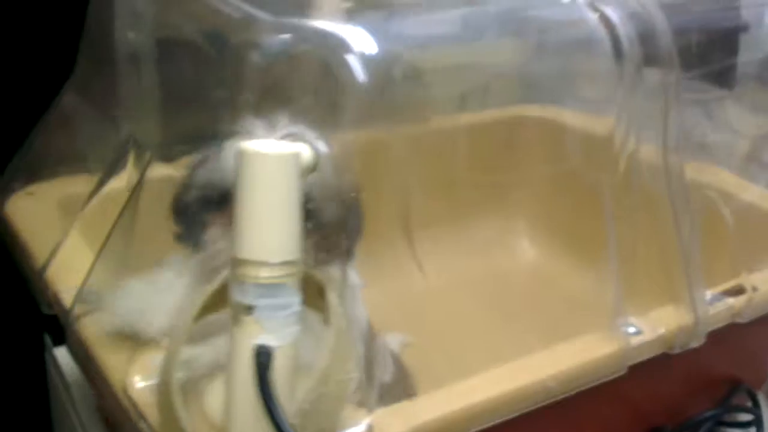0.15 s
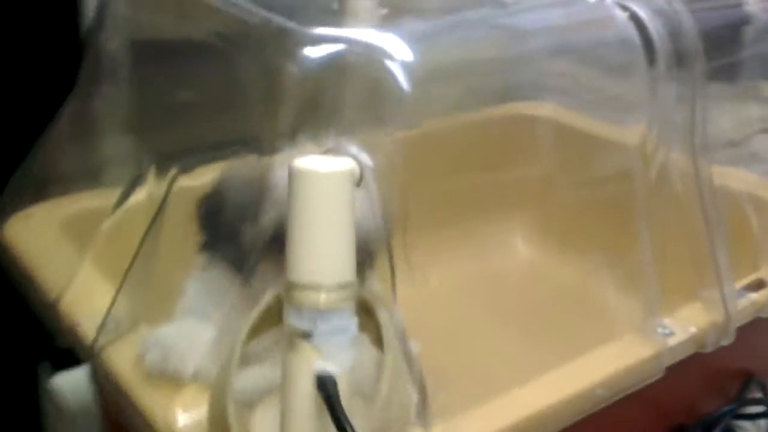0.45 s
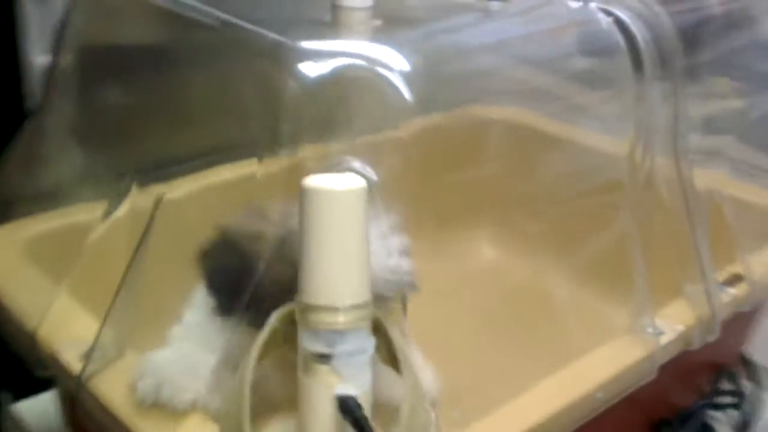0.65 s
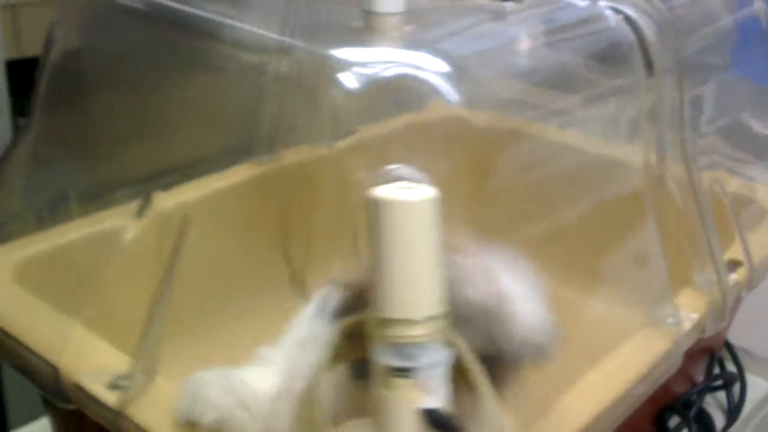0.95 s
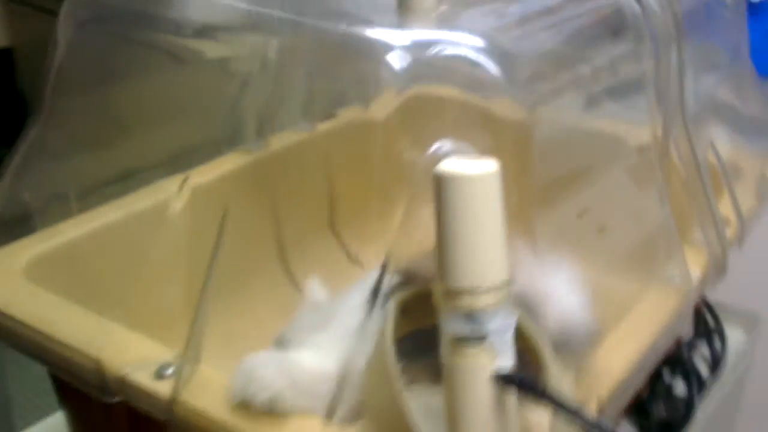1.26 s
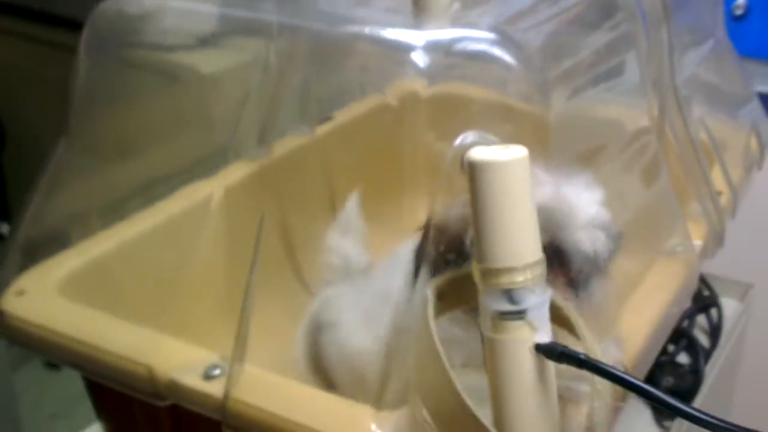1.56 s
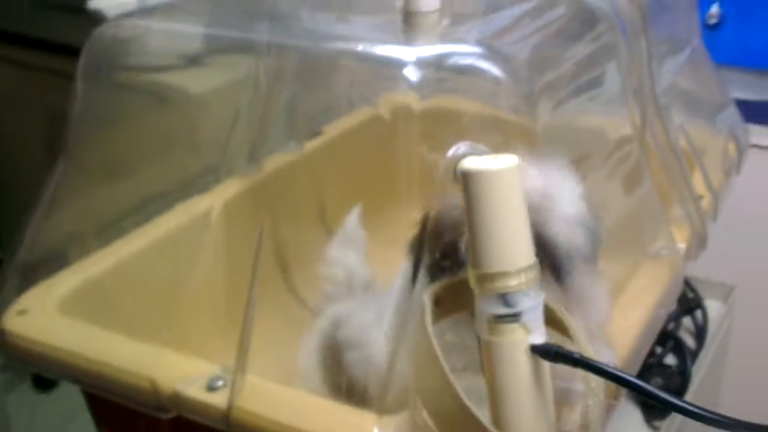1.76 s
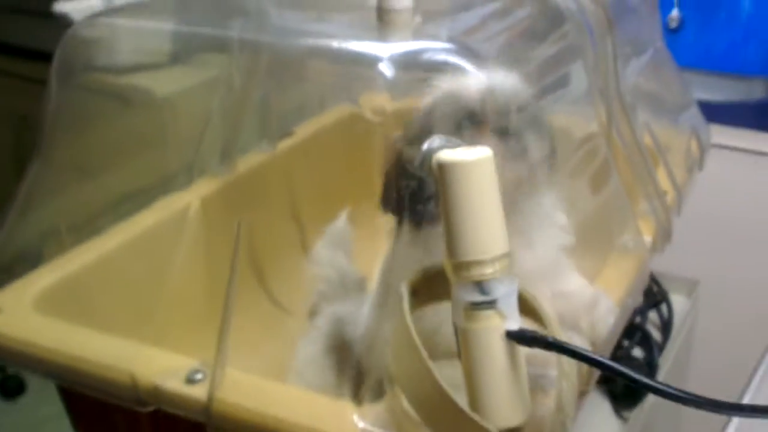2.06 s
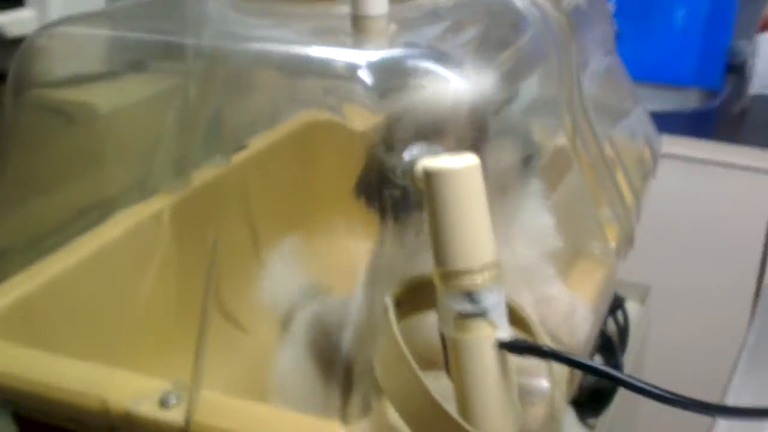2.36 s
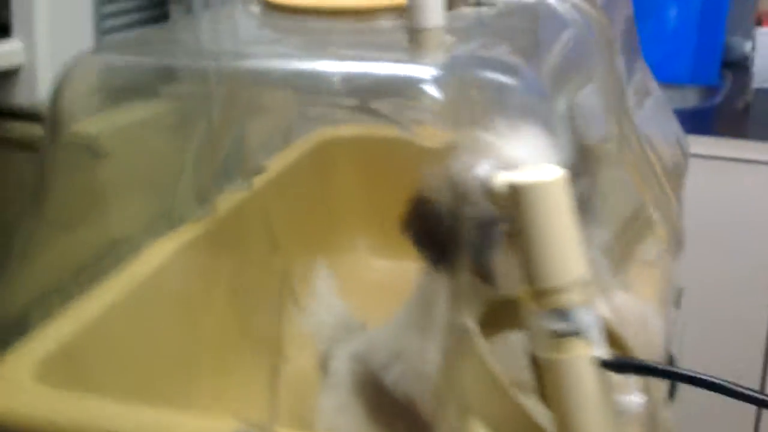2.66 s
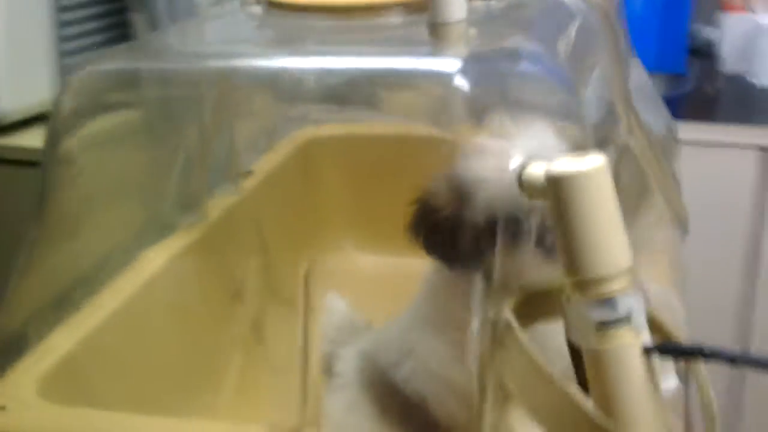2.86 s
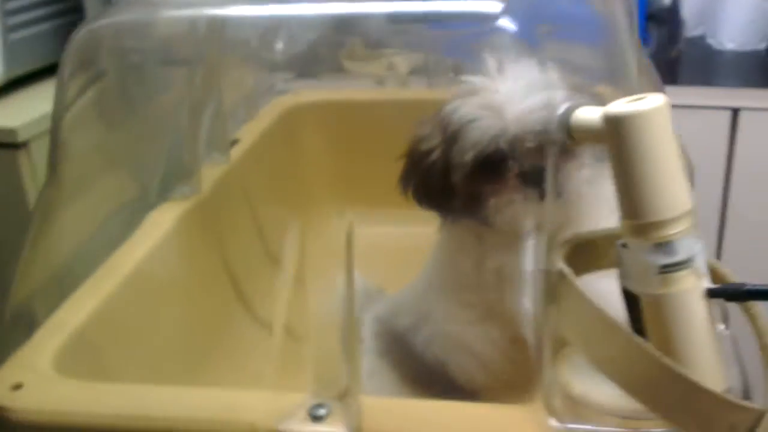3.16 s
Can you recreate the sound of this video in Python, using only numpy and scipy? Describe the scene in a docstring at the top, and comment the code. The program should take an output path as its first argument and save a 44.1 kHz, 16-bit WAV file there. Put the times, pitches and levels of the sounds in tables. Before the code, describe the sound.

Close stereo pickup indoors of a nebulizer's sharp, airy hiss with hollow airflow and a fast compressor buzz; around the middle a soft scuff and a thin whine pass, then the hiss continues more quietly.

```python
"""Under a clear plastic hood, a jet nebulizer mists a puppy's tub, close to a slowly moving microphone.
Sputtering noise and bursting drops, echoed by the hood, hiss through the resonances of cup and tube.
Further off a piston compressor throbs: three decaying tones a turn, over rumble and thin motor tones.
Midway comes a brief scuff of shaped noise, and a faint wavering tone whose pitch dips and rises:
a whine, probably from the puppy."""
import sys
import numpy as np
from scipy import signal
from scipy.fft import rfft, irfft, next_fast_len
from scipy.io import wavfile
from scipy.ndimage import uniform_filter1d, map_coordinates

SR = 44100
rng = np.random.default_rng(int(sys.argv[2]) if len(sys.argv) > 2 else 0)


def persist_wave(psi):
    """Save psi, clipped to +-1, as 16-bit WAV."""
    counts = np.round(np.clip(psi, -1, 1) * 32767).astype(np.int16)
    wavfile.write(sys.argv[1], SR, np.atleast_2d(counts).T)


N = 145089


def amp(db):
    """Decibels to gain."""
    return 10 ** (np.asarray(db) / 20)


def unit(x):
    """Scale to rms 1."""
    return x / np.sqrt(np.mean(x ** 2) + 1e-20)


def clock():
    """Time of every sample, in seconds."""
    return np.arange(N) / SR


def along(points, hz):
    """Read (frequency, value) points at hz, on a log frequency axis."""
    point_hz, values = np.transpose(points)
    return np.interp(np.log(hz + 1), np.log(np.sort(point_hz) + 1), values)


def curves(rows):
    """One value per sample for each column after the time."""
    times, *columns = np.transpose(rows)
    return [np.interp(clock(), times, column) for column in columns]


def wobble(rate):
    """A smooth random curve with rate knots a second."""
    return map_coordinates(rng.standard_normal(N), [clock() * rate], mode="wrap")


def filtered(x, response):
    """Multiply the spectrum of x by a response of frequency."""
    size = next_fast_len(N + SR // 4)
    spectrum = rfft(x, size) * response(np.fft.rfftfreq(size, 1 / SR))
    return irfft(spectrum, size)[..., :N]


def coloured(x, colour):
    """Shape x by (frequency, level) points, falling steeply outside them, at rms 1."""
    low_hz, top_hz = colour[0][0], colour[-1][0]

    def response(hz):
        skirts = np.minimum(hz / low_hz, 1) ** 10 / np.maximum(hz / top_hz, 1) ** 10
        return amp(along(colour, hz)) * skirts

    return unit(filtered(x, response))


def sides(pan_db):
    """Left and right gains with mean 1, from the left-right difference in dB."""
    gains = amp(np.array([pan_db, -pan_db]).reshape(2, -1) / 2)
    return gains / gains.mean(axis=0)


def noise_pair(alike):
    """Stereo white noise whose two sides share a part of their power."""
    share = np.clip(alike, 0, 1)
    common = np.sqrt(share) * rng.standard_normal(N)
    return common + np.sqrt(1 - share) * rng.standard_normal((2, N))


def hood(x, wet, count=26):
    """Direct sound plus the hood's dense decaying echoes, which change as the microphone moves."""
    t60_s, step_s = 0.073, 0.2203  # decay by 60 dB; time from one echo pattern to the next
    t = np.arange(SR // 10) / SR
    tails = rng.standard_normal((count, 2, len(t))) * amp(-60 * t / t60_s)
    echoes = np.zeros((2, N + len(t)))
    position = np.minimum(clock() / step_s, count - 1)
    for k, tail in enumerate(tails):
        near = np.flatnonzero(abs(position - k) < 1)
        if len(near):
            # neighbouring patterns crossfade at equal power
            feed = x[near] * np.sqrt(1 - abs(position[near] - k))
            echo = signal.fftconvolve(feed[None], tail, axes=1)
            echoes[:, near[0]:near[0] + echo.shape[1]] += echo
    share = np.clip(wet, 0, 1)
    return np.sqrt(1 - share) * unit(x) + np.sqrt(share) * unit(echoes[:, :N])


def placed(x, level, pan_db):
    """Even out a stream's power, then give it a level path and a side."""
    even_s = .07
    power = abs(uniform_filter1d(x ** 2, int(even_s * SR), axis=-1))
    return x / np.sqrt(power + 1e-9) * amp(curves(level)[0]) * sides(pan_db)


def rumble():
    """The compressor's soft low rumble: partly shared stereo noise, shaped by frequency."""
    # level of the rumble: (time [s], level [dB])
    rumble_level = [(.1, -55), (1.4, -61), (3.2, -62)]
    # its spectrum: (frequency [Hz], relative level [dB])
    rumble_colour = [(25, -27), (70, -50), (130, -14.5), (230, -3), (340, 8.5), (480, 9), (620, -14),
                     (1000, -32)]
    return amp(curves(rumble_level)[0]) * coloured(noise_pair(alike=0.44), rumble_colour)


def motor_whir():
    """Thin motor tones, unsteady in phase and level, whose balance changes as the microphone moves."""
    # tones: (frequency [Hz], start level before trim [dB], end level before trim [dB])
    whir_tones = [(586.8, -73, -72), (678.3, -68, -79), (726.7, -76, -68), (904.4, -64, -76),
                  (995.9, -72, -77), (1185, -71, -71), (1863, -82, -66), (1960, -84, -75)]
    trim_db, waver_db = -1, 2.5
    whir = np.zeros(N)
    for hz, first_db, last_db in whir_tones:
        level_db = np.linspace(first_db, last_db, N) + trim_db + waver_db * wobble(4.97)
        phase = 2 * np.pi * hz * clock() + 0.64 * wobble(9.7)
        whir += amp(level_db) * unit(np.sin(phase))
    return whir


def piston_thuds():
    """Piston and valves give three short, dull thuds a turn; their tone balance shifts over time."""
    # thuds in each turn: (delay [s], pitch [Hz], rise [s])
    thud_shapes = [(.00316, 412.5, .00265), (.0096, 432.7, .0037), (.01431, 351.1, .00383)]
    # levels before trim, as the microphone moves away:
    # (time [s], first thud [dB], second thud [dB], third thud [dB])
    thud_level = [(.3, -43.5, -41.7, -42.2), (.75, -46.4, -44.3, -43.4), (1.4, -54.4, -50.7, -47.1),
                  (2.35, -60, -51.7, -47.1), (2.95, -64.7, -51.2, -49.2)]
    # tone balance of the throb: (frequency [Hz], start [dB], middle [dB], end [dB])
    tone_balance = [(181, -3.5, 0, 3), (226, 8, -3, -4), (272, 2, -3, -5), (317, -1, 4.5, -2),
                    (362, 1, .5, 4), (408, -1, -1, -1), (453, 1.5, -1, -2), (498, -1, 0, 4)]
    # the microphone's progress: (time [s], place [0 start, 1 middle, 2 end])
    mic_place = [(.7, 0), (1.5, 1), (2.35, 1), (2.9, 2)]
    turns_per_s, scatter_db, low_hz, trim_db = 45.3, 1.25, 175, -0.15

    throb = np.zeros(N)
    for (delay, pitch_hz, rise), level_db in zip(thud_shapes, curves(thud_level)):
        turn, age = np.divmod(clock() - delay, 1 / turns_per_s)
        # each turn strikes with a slightly different strength
        strength = amp(scatter_db * rng.standard_normal(int(turn[-1]) + 2))
        for back in range(2):  # each thud rings on into the next turn
            t = age + back / turns_per_s
            swell = (t / rise * np.exp(1 - t / rise)) ** 2
            tone = np.sin(2 * np.pi * pitch_hz * t)
            throb += amp(level_db) * strength[turn.astype(int) - back] * swell * tone

    place, = curves(mic_place)
    balance_hz, *balances = np.transpose(tone_balance)
    heard = 0
    for i, balance_db in enumerate(balances):
        def response(hz):
            return amp(np.interp(hz, balance_hz, balance_db)) * np.minimum(hz / low_hz, 1) ** 4

        presence = np.maximum(1 - abs(place - i), 0)
        heard = heard + presence * filtered(throb, response)
    return amp(trim_db) * heard


def compressor():
    """The piston thuds and motor whir, set slightly to one side, over the rumble."""
    pan_db = 1
    return sides(pan_db) * (piston_thuds() + motor_whir()) + rumble()


def scuff():
    """A brief scuff: shaped stereo noise under a bell-shaped swell."""
    # spectrum of the scuff: (frequency [Hz], relative level [dB])
    scuff_colour = [(300, -42), (600, -9), (1300, -1), (2200, 9), (3400, -0.5), (5000, -41)]
    centre_s, width_s, level_db = 1.73, 0.047, -47.5
    swell = np.exp(-((clock() - centre_s) / width_s) ** 2)
    return amp(level_db) * swell * coloured(noise_pair(alike=0.41), scuff_colour)


def whine():
    """A thin, broken whine: one tone, unsteady in pitch and level, that dips, rises and fades."""
    # path before wavering: (time [s], pitch [Hz], level [dB])
    whine_path = [(1.40, 925, -76), (1.48, 915, -65), (1.56, 880, -76), (1.64, 865, -66), (1.72, 820, -70),
                  (1.79, 830, -57), (1.84, 860, -58), (1.89, 900, -57), (1.96, 910, -62), (2.08, 890, -70)]
    pitch_waver, level_waver_db = .007, 3.2  # share of the pitch; dB
    hz, level_db = curves(whine_path)
    sounding = (clock() > whine_path[0][0]) & (clock() < whine_path[-1][0])
    wavering_hz = hz * (1 + pitch_waver * wobble(140))
    tone = unit(np.sin(2 * np.pi * np.cumsum(wavering_hz) / SR))
    return sounding * amp(level_db + level_waver_db * wobble(54)) * tone


def airflow():
    """The softer, hollow rush of air through the tube: fluttering noise, echoed and shaped."""
    # level before trim: (time [s], level [dB])
    air_level = [(0.1, -45.5), (0.45, -48), (1.2, -48), (1.8, -46.5), (2.4, -49), (3.25, -48)]
    # spectrum of the rush: (frequency [Hz], relative level [dB])
    air_colour = [(320, -36), (540, -7.5), (574, -12.5), (627, -5), (697, -3.5), (774, -2), (891, -1.5),
                  (1050, -5.5), (1160, 1), (1470, -7), (1630, -4.5), (1770, -9), (1910, -8), (2050, -10.5),
                  (2340, -6), (2580, 6.5), (2940, -2.5), (3240, 1), (3500, -6.5), (4140, -36),
                  (4400, -12.5), (5720, -6), (9680, -120)]
    trim_db, pan_db = 1.5, 2
    rush = hood(amp(1.4 * wobble(300)) * rng.standard_normal(N), wet=0.71)
    return amp(trim_db) * placed(coloured(rush, air_colour), air_level, pan_db)


def jet():
    """Air tears liquid into mist: sputter and bursting drops ring cup and tube, finer spray above."""
    # levels before trim, as the microphone moves: the ringing hiss near 7.4 kHz, the cup's
    # broad hiss, the hiss's bright edge and the fine spray, each (time [s], level [dB])
    ring_level = [(0.1, -27), (0.45, -29), (0.52, -24.5), (0.68, -27), (0.96, -20.5), (1.12, -22.2),
                  (1.25, -20), (1.48, -21.0), (1.56, -28), (1.63, -22.5), (1.69, -33.5), (1.76, -22.5),
                  (1.8, -28), (1.88, -26), (1.97, -30.5), (2.05, -28), (2.2, -30.5), (2.45, -32.5),
                  (2.53, -27.5), (2.68, -36), (2.84, -39.5), (2.98, -36.5), (3.25, -31.5)]
    hiss_level = [(0.1, -30.5), (0.4, -30.8), (0.9, -32.1), (1.3, -34.1), (1.68, -36.3), (1.78, -34.7),
                  (2.25, -39.5), (2.55, -37.1), (2.95, -41.3), (3.25, -36.2)]
    edge_level = [(0.1, -28), (0.3, -25), (0.85, -26), (1.3, -37.5), (1.68, -34.5), (1.77, -45),
                  (1.95, -36.5), (2.55, -42), (2.68, -41.5), (2.78, -35), (2.98, -40.5), (3.25, -39.5)]
    spray_level = [(0.1, -33), (0.8, -31.5), (1.15, -35.5), (1.45, -37), (1.7, -38.5), (2.25, -40),
                   (2.68, -40), (2.77, -38), (3.02, -40.5), (3.11, -35.5), (3.17, -39.5), (3.25, -36.5)]
    # spectra of the same four layers, each (frequency [Hz], relative level [dB])
    ring_colour = [(4030, -83), (6850, -17.5), (7150, -3), (7390, 5), (7700, 1.5), (8200, -10.5),
                   (10700, -38), (18000, -120)]
    hiss_colour = [(2530, -29), (4300, -19), (4690, -12), (4960, -5.5), (5130, 3), (5560, -8.5),
                   (5870, -2.5), (6230, -9.5), (6650, -6.5), (6900, -7.5), (8970, -37), (15200, -120)]
    edge_colour = [(4760, -50.5), (8100, 5), (8900, 4.5), (9400, -32), (12200, -52), (20700, -120)]
    spray_colour = [(5470, -31), (9300, -1), (9510, -2), (10100, 0), (10700, -4), (11400, -3), (12000, -5),
                    (13200, -2), (14500, -10), (15100, -8), (15700, -9)]
    # the spray leans to one side by frequency: (frequency [Hz], left-right [dB])
    spray_lean = [(9400, -6.5), (10000, 8), (11300, 1.5), (12300, -0.5), (13200, 5.5), (14200, -4),
                  (15400, -5)]
    # side of each layer, left-right: (time [s], ring [dB], hiss [dB], edge [dB], spray [dB])
    side_path = [(0.1, -15, -1, 7, 4), (0.18, -8.5, -2.5, 3.5, 3), (0.67, -9.5, -2.5, 2.5, 4),
                 (1.22, -11.5, -8.5, -4, -6), (1.67, -8.0, -7.5, -6, -2), (2.59, -11, -5, 9, 1),
                 (2.82, -8, -2.5, 1.5, 3), (3.28, -6, -5, 13, 2)]
    ring_db, hiss_db, edge_db, spray_db = -0.5, 2, -0.5, 3  # trims
    # uneven feed of liquid: depth [dB] and pace [knots per s]
    sputter_db, sputter_rate, surge_db, surge_rate = 1, 1200, 0.84, 45
    drops_per_s, drop_db = 170, -9.5  # drop rms against the tearing noise

    surge = amp(surge_db * wobble(surge_rate))
    bursts = rng.random(N) < drops_per_s / SR
    drops = unit(bursts * rng.uniform(-1.17, 1, N))
    sputter = unit(amp(sputter_db * wobble(sputter_rate)) * rng.standard_normal(N))
    tearing = surge * (sputter + amp(drop_db) * drops)
    # two separate sets of hood echoes
    ringing, broad = hood(tearing, wet=0.71), hood(tearing, wet=0.72)
    mist = hood(surge * amp(1.9 * wobble(1500)) * rng.standard_normal(N), wet=0.67)
    mist = filtered(mist, lambda hz: sides(along(spray_lean, hz)))

    ring_pan, hiss_pan, edge_pan, spray_pan = curves(side_path)
    ring = amp(ring_db) * placed(coloured(ringing, ring_colour), ring_level, ring_pan)
    hiss = amp(hiss_db) * placed(coloured(broad, hiss_colour), hiss_level, hiss_pan)
    edge = amp(edge_db) * placed(coloured(ringing, edge_colour), edge_level, edge_pan)
    spray = placed(coloured(mist, spray_colour), spray_level, spray_pan)
    spray_gain = amp(spray_db + 0.88 * wobble(10.8))
    return ring + hiss + edge + spray_gain * spray


def scene():
    """Compressor further off, then scuff and whine, with the tube's airflow and the close jet."""
    return compressor() + scuff() + whine() + airflow() + jet()


def record(dry):
    """The recorder opens just after the start and keeps nothing above its band limit."""
    start_s, fade_s, top_hz = .078, .003, 15780
    opening = np.clip((clock() - start_s) / fade_s, 0, 1)
    return filtered(dry * opening, lambda hz: hz < top_hz)


dry = scene()
out = record(dry)
persist_wave(out)
```